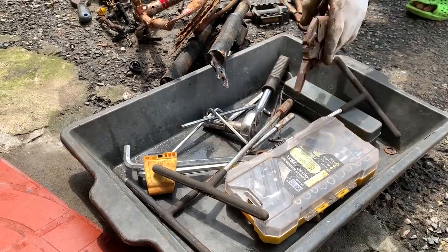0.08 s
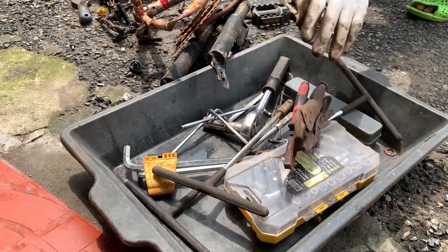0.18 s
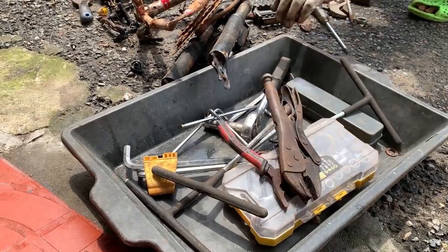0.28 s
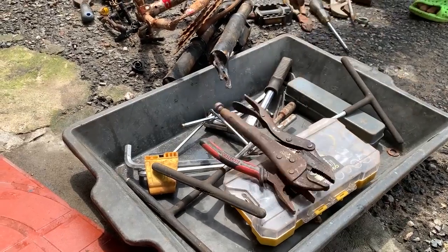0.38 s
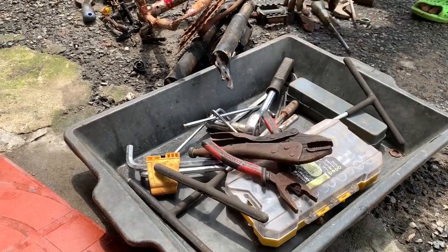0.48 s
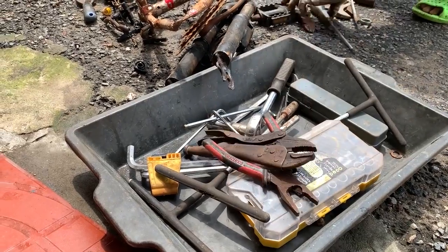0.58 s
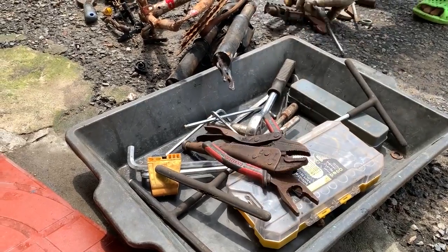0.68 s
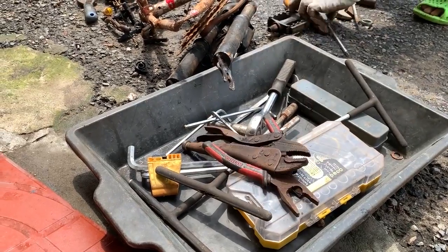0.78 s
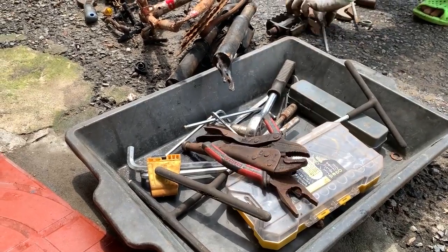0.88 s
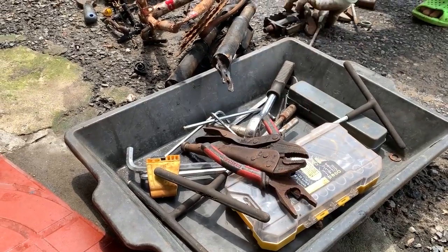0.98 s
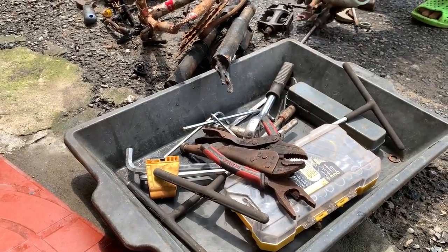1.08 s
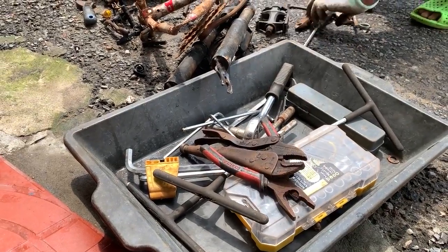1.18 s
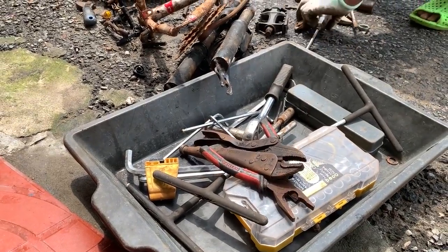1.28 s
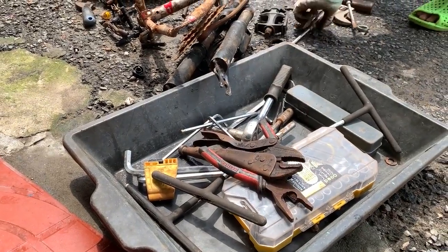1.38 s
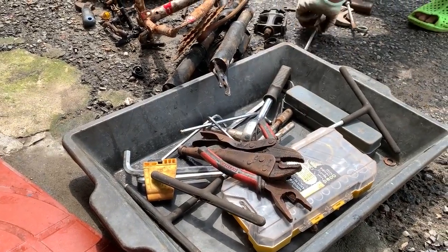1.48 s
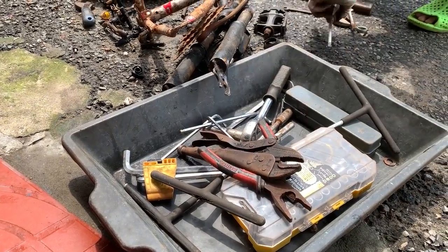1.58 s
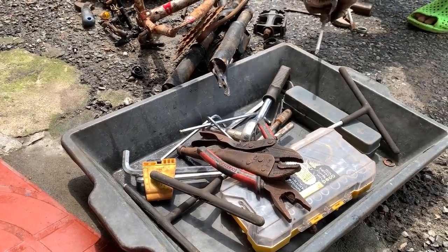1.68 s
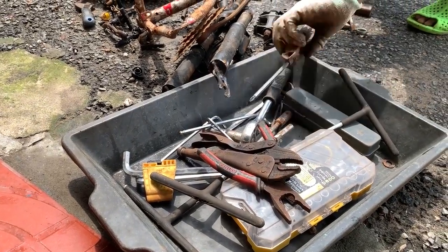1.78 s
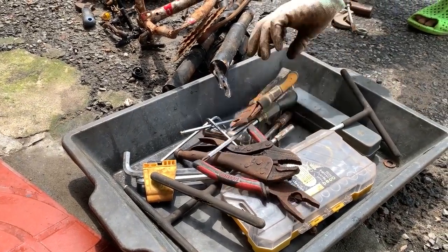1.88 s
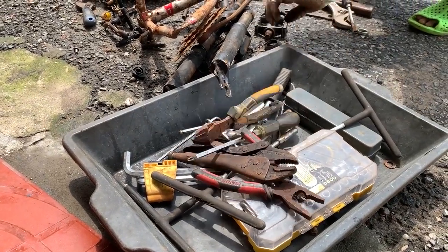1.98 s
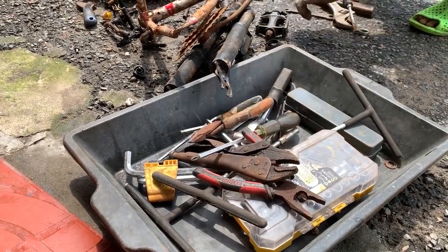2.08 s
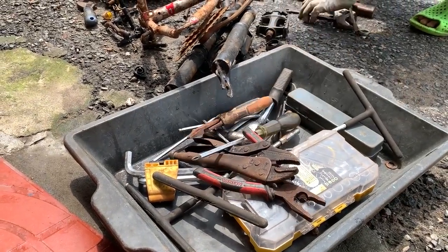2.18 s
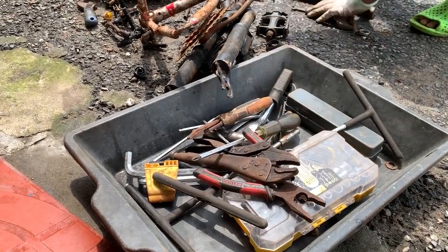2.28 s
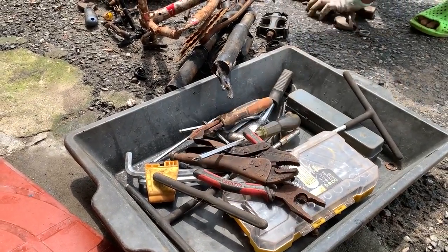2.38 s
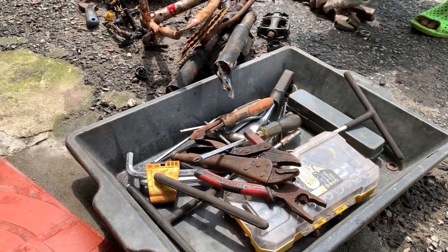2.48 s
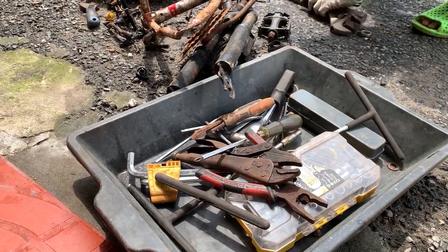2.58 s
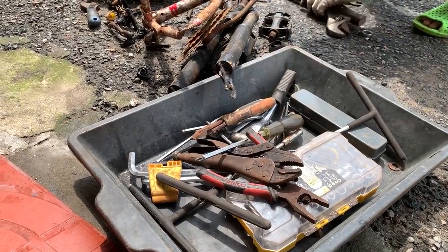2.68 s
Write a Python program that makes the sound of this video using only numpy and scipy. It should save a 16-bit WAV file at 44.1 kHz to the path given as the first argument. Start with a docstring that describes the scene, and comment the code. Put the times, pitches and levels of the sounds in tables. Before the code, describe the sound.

Close outdoor pickup of steel tools landing in a hollow plastic tray, first a gritty crash with rattling, then faint clinks and a pause, another sharp clank with settling knocks, and a thin high ring.

```python
"""Rusty tools dropped in a tray

Rusty pliers, rods and spanners land on a heap of tools in a plastic tray outdoors.
Each knock is a snap, a gritty noise burst and a rattle, sent through tray and heap resonances.
Decaying modes make steel ring; light ticks, short scrapes and a faint rumble are filtered noise."""
import sys
import numpy as np
from scipy import signal
from scipy.fft import rfft, irfft, next_fast_len
from scipy.io import wavfile

SR = 44100
rng = np.random.default_rng(int(sys.argv[2]) if len(sys.argv) > 2 else 0)


def unload_audio(sound):
    """Save the sound as a 16-bit wav file, at the path given as the first command line argument."""
    columns = np.transpose(np.atleast_2d(sound))
    # keep every value between -1 and 1, then stretch to whole-number steps
    steps = np.round(np.clip(columns, -1, 1) * 32767)
    wavfile.write(sys.argv[1], SR, steps.astype(np.int16))


N = 119070


def amp(db):
    """Decibels to linear gain."""
    return 10 ** (np.asarray(db, float) / 20)


def rms_one(x):
    """Scale to an rms of 1."""
    return x / np.sqrt(np.mean(x ** 2) + 1e-20)


def clicks(times, gains):
    """Single-sample impulses at the given times in seconds."""
    out = np.full(N, 1e-18)
    places = np.minimum((np.asarray(times) * SR).astype(int), N - 1)
    np.add.at(out, places, gains)
    return out


def dying(x, t60):
    """Each impulse starts an exponential decay, down 60 dB after t60 seconds."""
    return signal.lfilter([1], [1, -amp(-60 / (t60 * SR))], x)


def soften(x, seconds):
    """One-pole smoothing of a rise; slow signals keep their height."""
    r = np.exp(-1 / (seconds * SR + 1))
    return signal.lfilter([1 - r], [1, -r], x)


def wobble(per_s):
    """Random wander: straight lines between normal draws, per_s draws a second."""
    draws = rng.standard_normal(1000)
    return np.interp(np.arange(N) / SR * per_s, np.arange(1000), draws)


def resonance(x, hz, width):
    """Narrow two-pole band-pass, gain 1 at its peak."""
    r = np.exp(-np.pi * width / SR)
    poles = [1, -2 * r * np.cos(2 * np.pi * hz / SR), r * r]
    return (1 - r * r) / 2 * signal.lfilter([1, 0, -1], poles, x)


GRIT_PER_S, GRIT_DB, GRIT_SHARE = 1400, 5, 0.42  # flakes a second, size spread, depth in the noise


def grit():
    """Noise roughened by short, uneven flakes of rust; rms 1."""
    sizes = amp(GRIT_DB * np.minimum(rng.exponential(1, N), 4))
    flakes = (rng.random(N) < GRIT_PER_S / SR) * sizes
    roughness = rms_one(dying(flakes, 0.0042))
    return rms_one(rng.standard_normal(N) * (1 - GRIT_SHARE + GRIT_SHARE * roughness))


# tone of the rumble, before levelling: (frequency [Hz], relative level per Hz [dB])
AIR_TONE = [(30, -27), (50, -5), (100, -8.5), (180, -12.5), (290, -23.5), (500, -16), (800, -25.5),
            (4000, -37), (16000, -48.5)]
# loudness of the rumble: (time [s], level [dB])
AIR_LEVEL = [(0, -62.5), (1.246, -59), (1.6, -67.5), (2.7, -57.5)]


def air():
    """Distant outdoor rumble: shaped noise, alike in both channels only in the deep bass."""
    hz = np.maximum(np.arange(N // 2 + 1) * SR / N, 1)
    tone_hz, tone_db = np.transpose(AIR_TONE)
    tone = amp(np.interp(np.log(hz), np.log(tone_hz), tone_db))
    both, *own = rfft(rng.standard_normal((3, N)))
    alike = 1 / (1 + (hz / 300) ** 2)
    spectrum = np.sqrt(alike) * both + np.sqrt(1 - alike) * np.array(own)
    level_db = np.interp(np.arange(N) / SR, *np.transpose(AIR_LEVEL))
    return amp(level_db) * rms_one(irfft(spectrum * tone, N))


# sliding tools: (start [s], end [s], level at the end [dB], centre pitch [Hz])
SCRAPES = [(1.069, 1.135, -59, 3500), (1.851, 1.938, -60, 1294), (2.336, 2.402, -51.5, 5860)]


def scrapes():
    """Tools slide: grit in a band two octaves wide swells, then stops softly."""
    out, t = np.zeros((2, N)), np.arange(N) / SR
    for start, end, db, hz in SCRAPES:
        swell = np.interp(t, [start, end], [.5, 1], left=0, right=0)
        sos = signal.butter(1, [hz / 2, hz * 2], "band", fs=SR, output="sos")
        pair = grit() + .5 * np.array([grit(), grit()])  # shared grit plus some per channel
        out += amp(db) * soften(swell, .004) * rms_one(signal.sosfilt(sos, pair))
    return out


# light touches of small parts: (time [s], peak level of the ring [dB], pitch [Hz])
TICKS = [(.565, -35, 634), (.721, -42, 2840), (0.818, -43, 2980), (1.122, -33, 8100), (1.235, -53.5, 2000),
         (1.473, -47.5, 4860), (1.966, -33, 1860), (1.985, -27.5, 1710), (2.082, -56, 520),
         (2.145, -35, 1460), (2.406, -36, 3060), (2.442, -35.5, 3200)]
TICK_SHARPNESS = 19  # pitch over width


def ticks():
    """A few milliseconds of noisy contact ring one damped resonance."""
    out, t = np.zeros(N + SR), np.arange(SR // 10) / SR
    contact = rng.standard_normal((len(TICKS), len(t))) * amp(-60 * t / 0.024)
    for (s, db, hz), touch in zip(TICKS, contact):
        ring = resonance(touch, hz, hz / TICK_SHARPNESS)
        start = int(s * SR)
        out[start:start + len(t)] += amp(db) * (ring / np.abs(ring).max() + 0.11 * touch)
    return out[:N]


FAVOUR_DB_PER_OCT = 17  # loss of a mode per octave from the blow's favoured pitch
CHATTER_DB, CHATTER_PER_S = 6, 110  # depth and pace of the waver


def steel(t60, modes, blows):
    """Every blow rings all modes, most those near its favoured pitch; loose contact makes them waver."""
    s, db, near_hz = np.transpose(blows)
    out = np.zeros(N)
    r = amp(-60 / (t60 * SR))
    for hz, mode_db in modes:
        w = 2 * np.pi * hz / SR
        off_pitch_db = FAVOUR_DB_PER_OCT * np.abs(np.log2(hz / near_hz))
        hit = clicks(s, amp(db + mode_db - off_pitch_db))
        ring = signal.lfilter([0, np.cos(w / 2)], [1, -2 * r * np.cos(w), r * r], hit)
        out += amp(CHATTER_DB * wobble(CHATTER_PER_S)) * ring
    return np.diff(out, prepend=0)  # turns each decaying sine into a cosine with a hard onset


# modes of the rod: (frequency [Hz], relative level [dB])
ROD_MODES = [(8690, -7.5), (11200, -12.5), (14390, 2.5)]
# blows on the rod: (time [s], level [dB], favoured pitch [Hz])
ROD_BLOWS = [(1.287, -42, 9060), (2.362, -37, 15000), (2.383, -19.5, 9900)]


def rod():
    """High modes of a steel rod, dying in 0.2 s."""
    return steel(0.2, ROD_MODES, ROD_BLOWS)


# modes of the rod's other face: (frequency [Hz], relative level [dB])
ROD_SIDE_MODES = [(5490, -7.5), (13400, -5.5)]
# blows on that face: (time [s], level [dB], favoured pitch [Hz])
ROD_SIDE_BLOWS = [(2.392, -32, 13000), (2.411, -23.5, 13600)]


def rod_side():
    """The same rod knocked on its other face, which wakes other modes."""
    return steel(0.24, ROD_SIDE_MODES, ROD_SIDE_BLOWS)


# modes of the pliers: (frequency [Hz], relative level [dB])
PLIERS_MODES = [(4340, 9.5), (11300, -13.5), (13290, -15.5), (14150, -5.5), (14890, -6)]
# blows on the pliers: (time [s], level [dB], favoured pitch [Hz])
PLIERS_BLOWS = [(0.413, -42, 6950), (0.529, -27, 5360), (0.667, -29, 14500), (1.123, -44, 6000),
                (1.287, -50.5, 4520), (2.007, -34, 6370), (2.172, -25, 13300)]


def pliers():
    """Pliers ring briefly, well damped."""
    return steel(0.048, PLIERS_MODES, PLIERS_BLOWS)


# modes of the spanner: (frequency [Hz], relative level [dB])
SPANNER_MODES = [(1400, -5.5), (2821, 1.5), (4452, -5), (6255, 7.5), (12030, 8), (14340, 16.5)]
# blows on the spanner: (time [s], level [dB], favoured pitch [Hz])
SPANNER_BLOWS = [(2.622, -34, 1570), (2.642, -35.5, 3020), (2.659, -37.5, 7300), (2.69, -43.5, 2720)]


def spanner():
    """A spanner's modes spread from low to very high."""
    return steel(0.085, SPANNER_MODES, SPANNER_BLOWS)


# modes of the wrench: (frequency [Hz], relative level [dB])
WRENCH_MODES = [(1120, 0.5), (1830, -2.36), (2150, -2.84)]
# blows on the wrench: (time [s], level [dB], favoured pitch [Hz])
WRENCH_BLOWS = [(0.243, -19.5, 2160), (.265, -13, 3000), (1.931, -5, 1335), (2.165, -24.5, 1600)]


def wrench():
    """A wrench gives a low, very short clank."""
    return steel(0.024, WRENCH_MODES, WRENCH_BLOWS)


# plastic tray resonances: (frequency [Hz], width [Hz], level before TRAY_DB is added [dB])
TRAY_MODES = [(253.2, 13, -12.5), (498, 61, 0), (628, 51, 0), (1156, 230, -8)]
TRAY_DB = 15


def tray(x):
    """Direct sound plus the booming resonances of the tray, in alternating polarity."""
    out = x
    for k, (hz, width, db) in enumerate(TRAY_MODES):
        out = out + (-1) ** k * amp(db + TRAY_DB) * resonance(x, hz, width)
    return out


HEAP_DB, HEAP_WIDTH_HZ = 6, 60


def heap(x):
    """Many loose tools ring along: forty scattered resonances, each with a slowly wandering random level."""
    pitches = np.geomspace(1000, 15000, 40) * rng.uniform(.97, 1.03, 40)
    return x + amp(HEAP_DB) * sum(wobble(15) * resonance(x, hz, HEAP_WIDTH_HZ) for hz in pitches)


BOUNCES_PER_S, BOUNCE_T60_S = 70, .03


def bounces():
    """Loose parts settle in small uneven hops: a power curve of mean 1."""
    hops = dying((rng.random(N) < BOUNCES_PER_S / SR) * rng.random(N) + 1e-18, BOUNCE_T60_S / 2)
    return .5 + .5 * hops / hops.mean()


# knocks, relative levels: (time [s], crack [dB], thud [dB], mid knock [dB], sizzle [dB])
KNOCKS = [(0.2378, -14, -16.5, -21, -25.5), (0.2643, -9, -18, -21, -20.5), (0.2931, -15.5, -30, -25, -29.5),
          (0.35, -45, -32, -42.5, -45), (0.4045, -31, -30, -37, -42), (0.5312, -23, -26.5, -24, -29.5),
          (0.6658, -29.5, -34.5, -37, -40.5), (0.835, -36, -48, -45.5, -64), (1.1166, -25, -62.5, -41, -43),
          (1.2031, -32.5, -52.5, -44, -54), (1.4561, -34.5, -58.5, -51.5, -54),
          (1.9207, -13, -41.5, -35, -28.5), (1.93, -7, -22.5, -18.5, -24), (2.0052, -22.5, -31, -27, -29),
          (2.162, -24.5, -20, -21, -29), (2.401, -23.5, -75, -38, -43), (2.6211, -48, -34.5, -31.5, -42.5)]
# crack, thud, mid knock and sizzle bands: (low edge [Hz], high edge [Hz], gain [dB], burst t60 [s],
# rattle level [dB], rattle t60 [s], left-right likeness [0-1])
BANDS = [(2830, 6560, -11, 0.035, -9, 0.27, 0.16), (139, 509, -4, 0.02, -7, 0.35, 0.85),
         (930, 2830, -1, 0.024, -8, 0.34, 0.54), (8130, 14000, 5.5, 0.069, -8.5, 0.21, 0.99)]
ATTACK_S, ATTACK_CYCLES = .0005, .2  # rise time, plus cycles of the low band edge
SNAP_DB = 17  # gain of the first-contact click
SETTLED_FROM_S, SETTLED_RATTLE = 2.1, .5  # heap lies tight: low rattles last this share of their time


def knocks():
    """In each band a knock snaps, bursts and rattles in grit; tray and heap ring along."""
    s, *levels = np.transpose(KNOCKS)
    out, hops = np.zeros((2, N)), bounces()
    settled = np.arange(N) > SETTLED_FROM_S * SR
    for db, (low_hz, high_hz, gain_db, t60, tail_db, tail_t60, alike) in zip(levels, BANDS):
        # decays run on power, so half the t60 gives the full t60 in amplitude
        power = clicks(s, amp(2 * (db + gain_db)))
        late = power * settled * (low_hz < 1000)
        loose_rattle = dying(power - late + 1e-18, tail_t60 / 2)
        tight_rattle = dying(late + 1e-18, SETTLED_RATTLE * tail_t60 / 2)
        rattle = amp(2 * tail_db) * hops * (loose_rattle + tight_rattle)
        envelope = np.sqrt(dying(power, t60 / 2) + rattle)
        envelope = soften(envelope, ATTACK_S + ATTACK_CYCLES / low_hz)
        mid, side = grit(), grit()
        pair = np.sqrt((1 + alike) / 2) * mid + np.sqrt((1 - alike) / 2) * side * np.array([[1], [-1]])
        snap = clicks(s + 2 * ATTACK_S, amp(db + gain_db + SNAP_DB))
        sos = signal.butter(2, [low_hz, high_hz], "band", fs=SR, output="sos")
        norm = np.sqrt(SR / 2 / (high_hz - low_hz))  # makes up for the narrow band
        out += norm * signal.sosfilt(sos, envelope * pair + snap)
    return heap(tray(out) / 2)


def scene():
    """Rumble, scrapes, ticks and ringing steel under the knocks."""
    ringing = rod() + rod_side() + pliers() + spanner() + wrench()
    return air() + scrapes() + ticks() + ringing + knocks()


# two microphone ports: (frequency [Hz], phase lead of the right one [rad])
PORTS = [(250, -1), (1200, 0), (4200, -1.4), (10700, 3.14), (13800, 6.3), (17000, 10.1)]
LEFT_DB = -.5  # the right channel gets the opposite
CUTOFF_HZ = 16500


def record(dry):
    """The ports drift out of phase in the treble; peaks are rounded, the top is cut."""
    size = next_fast_len(N + 4096)
    hz = np.arange(size // 2 + 1) * SR / size
    lead = np.interp(hz, *np.transpose(PORTS))
    turn = np.exp(.5j * lead * np.array([[-1], [1]]))
    wet = irfft(rfft(dry, size) * turn, size)[:, :N] * amp([[LEFT_DB], [-LEFT_DB]])
    rounded = np.tanh(2 * wet) / 2
    return signal.sosfilt(signal.cheby2(12, 70, CUTOFF_HZ, fs=SR, output="sos"), rounded)


dry = scene()
out = record(dry)
unload_audio(out)
```